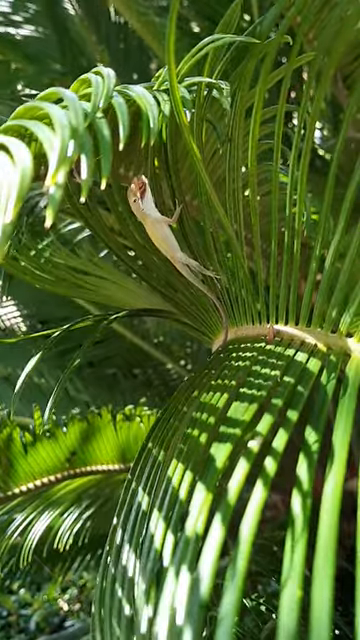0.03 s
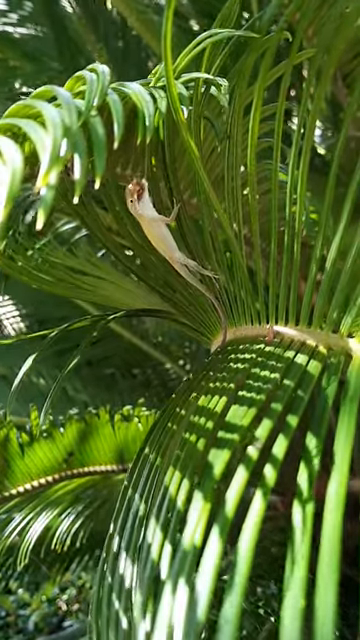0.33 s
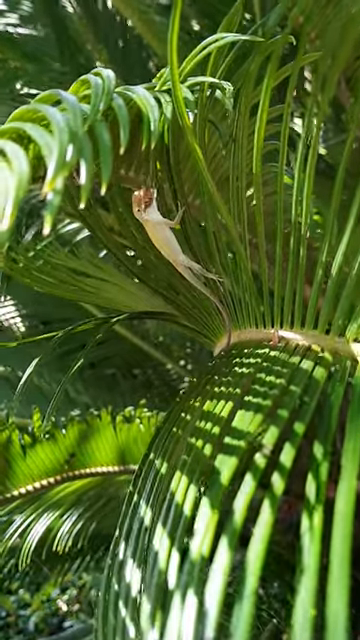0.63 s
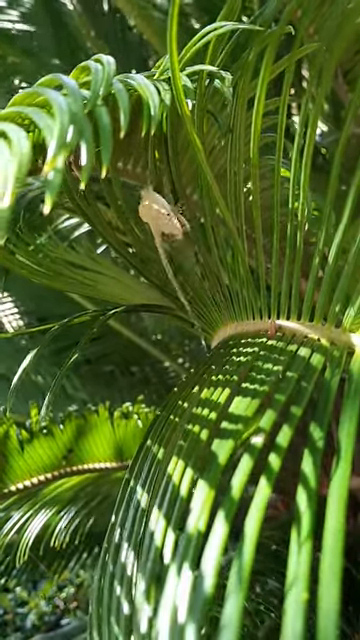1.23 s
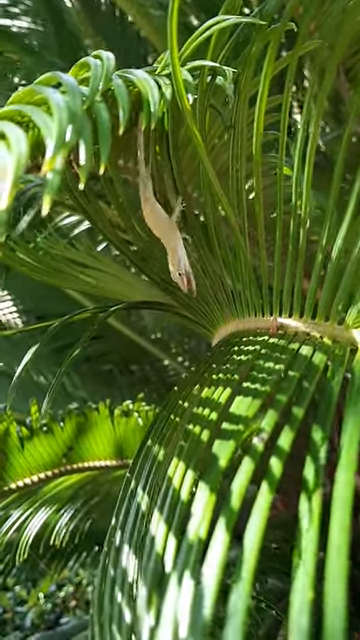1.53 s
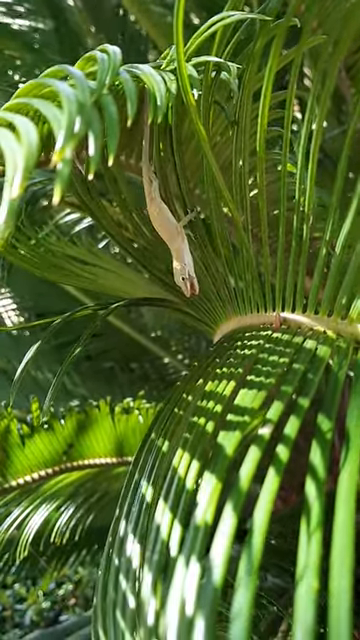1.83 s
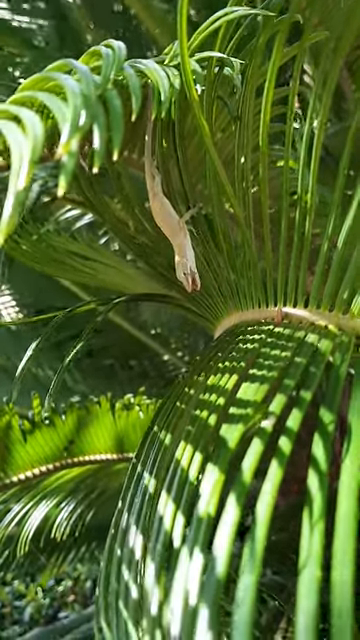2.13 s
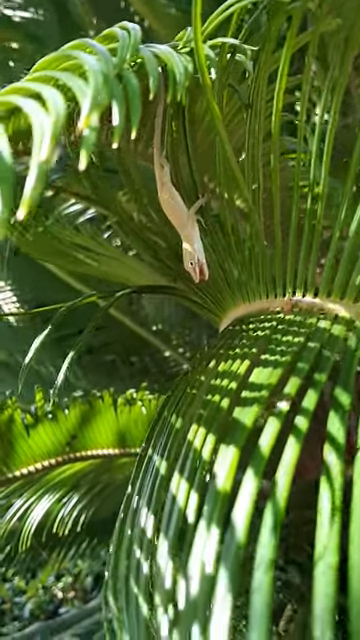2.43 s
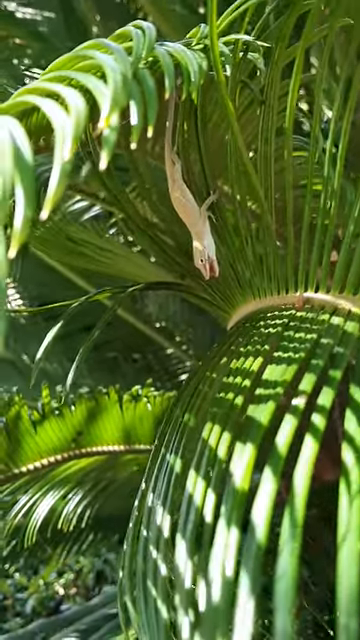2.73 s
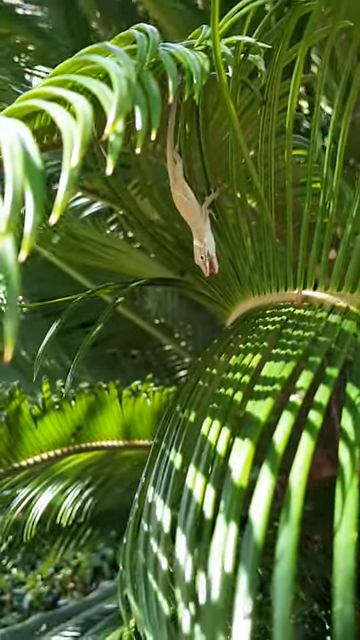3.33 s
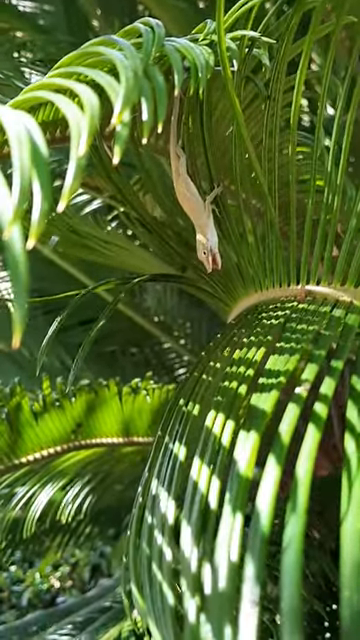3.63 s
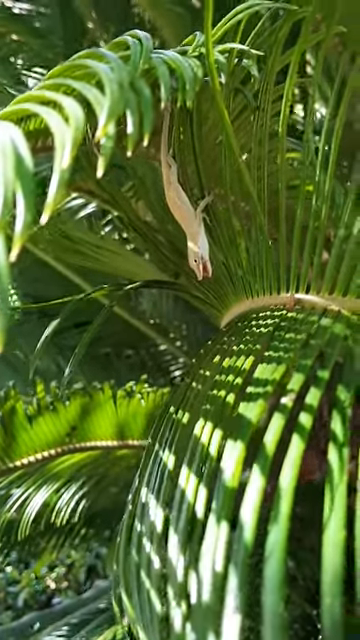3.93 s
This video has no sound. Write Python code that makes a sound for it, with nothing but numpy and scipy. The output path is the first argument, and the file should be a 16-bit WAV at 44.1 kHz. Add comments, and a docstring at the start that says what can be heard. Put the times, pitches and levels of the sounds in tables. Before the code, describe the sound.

Distant traffic rumbles low throughout, with a faint high insect hiss and thin whine in a garden. Soft dull bumps come at about 0.6 seconds. From 1.2 seconds a far engine drone swells three times, rising slightly in pitch until 3.2 seconds. Leaves tick at 1.5 and 1.8 seconds, and light gusts touch the microphone. Near 4 seconds, faint tyre hiss, leaf rustle and a high buzz grow.

```python
"""A garden: far traffic, an insect chorus and a thin steady whine run throughout.
Very high hiss, probably insects, comes in waves from the right; single whine partials swell briefly.
A faint low note at 0.4 s precedes four soft bumps. From 1.2 s a distant engine's low drone swells
three times, gaining speed until 3.2 s. Leaves rustle and tick twice (1.5 s, 1.8 s); two light gusts
rumble on the microphone. At the end an approaching car's tyre hiss grows and a high buzz starts."""
import sys
import numpy as np
from scipy import signal
from scipy.io import wavfile

SR = 44100
rng = np.random.default_rng(int(sys.argv[2]) if len(sys.argv) > 2 else 0)


def store_pcm(level_fs):
    """Save levels as 16-bit WAV."""
    pcm = np.round(np.clip(level_fs, -1, 1) * 32767).astype(np.int16)
    wavfile.write(sys.argv[1], SR, np.atleast_2d(pcm).T)


N = 176400
T = np.arange(N) / SR


def engine():
    """Distant engine: only the lowest firing orders and some exhaust rumble carry this far."""
    # firing rate: t/s, f/Hz
    firing_hz = [(0, 74), (1.15, 84.5), (1.35, 87.4), (1.75, 88.5), (2.05, 92.5), (2.35, 97.5),
                 (2.65, 100.5), (3.0, 102), (3.2, 103.7), (3.4, 101.5), (4, 90)]
    # loudness: t/s, level/dB
    loudness = [(0, -59), (1.14, -59), (1.22, -40.5), (1.4, -41), (1.56, -39.5), (1.63, -38), (1.72, -39),
                (1.87, -59.5), (2.01, -49.5), (2.06, -35.5), (2.2, -41), (2.35, -35), (2.55, -39),
                (2.68, -38.5), (2.75, -51), (2.84, -39), (2.9, -43), (3.0, -32.5), (3.13, -34.5),
                (3.19, -30), (3.27, -34.5), (3.36, -37), (3.48, -46.5), (4, -55.5)]
    # harmonics: multiple of firing rate, relative level/dB
    orders = [(1, 0.5), (2, -20.5), (3, -24.5)]
    # exhaust spectrum: f/Hz, relative density/dB
    spectrum = [(30, -19), (55, -12), (90, 3), (160, -6), (230, -15), (330, -9), (480, -30), (1000, -17.5),
                (3000, -73)]
    level_db = in_time(loudness)
    wobble, flutter_db = .005, .9
    hz = in_time(firing_hz) * (1 + wobble * drift(13.2))
    phase = 2 * np.pi * np.cumsum(hz) / SR
    drone = sum(from_db(level_db + order_db + flutter_db * drift(14)) * np.sin(order * phase)
                for order, order_db in orders)
    exhaust_db = -48.5 + .32 * (level_db - level_db.mean())  # follows the drone weakly
    exhaust = from_db(exhaust_db) * air_noise(spectrum, flicker_db=2.2)
    return (np.sqrt(2) * drone + exhaust) * pan(.9)


def traffic():
    """Low town rumble under a slowly growing wash of tyres."""
    # town rumble spectrum: f/Hz, relative density/dB
    rumble_spectrum = [(22, -42), (38, -17), (55, -2.5), (80, 0.5), (110, -3.5), (150, -1), (240, -13),
                       (320, -3.5), (430, -24), (700, -22), (2000, -39.5)]
    # rumble loudness: t/s, level/dB
    rumble_db = [(0, -48.5), (1.0, -47.5), (1.6, -46), (4, -46.5)]
    # tyre spectrum: f/Hz, relative density/dB
    tyre_spectrum = [(150, -8.5), (450, -6), (760, 1), (1200, -0.5), (1700, -7), (2500, -15), (3400, -29.5),
                     (5000, -46), (8000, -56), (9500, -37), (11500, -48), (15500, -60)]
    # tyre loudness: t/s, level/dB
    tyre_db = [(0.0, -50.5), (0.59, -50), (0.92, -50.5), (3.35, -48.5), (3.59, -49), (4.0, -47)]
    # tyre balance: f/Hz, left minus right/dB
    tyre_pans = [(400, 8), (750, 2), (1300, 0), (2400, -4.5), (4000, 17), (15000, 19)]
    rumble = from_db(in_time(rumble_db)) * air_noise(rumble_spectrum, flicker_db=1.8) * pan(-.3)
    tyres = from_db(in_time(tyre_db)) * air_noise(tyre_spectrum, flicker_db=1, pans=tyre_pans)
    return rumble + tyres


def bumps():
    """A cluster of dull thuds, each a puff of noise and a brief low ring."""
    # thuds: t/s, level/dB, puff decay/s
    thuds = [(.573, -35.5, .045), (.600, -40, .03), (.617, -37.3, .05), (.685, -39.5, .04)]
    # puff spectrum: f/Hz, relative density/dB
    spectrum = [(25, -30), (55, 0), (110, 4), (150, -4), (200, -11), (280, -11), (450, -23), (900, -22),
                (2500, -61)]
    # ringing modes: f/Hz, relative level/dB, t60/s
    modes = [(59.2, 1, 0.36), (112.1, 1, 0.34), (277, -15, 0.089)]
    attack_s = .004
    envelope = sum(from_db(db) * strike(start_s, attack_s, decay_s) for start_s, db, decay_s in thuds)
    out = envelope * air_noise(spectrum, flicker_db=0)
    for start_s, db, _ in thuds:
        for hz, mode_db, t60_s in modes:
            ring = from_db(db + mode_db) * strike(start_s, attack_s, t60_s / np.log(1000))
            out += ring * np.sin(2 * np.pi * hz * (T - start_s))
    return out


def leaf_ticks():
    """Stiff fronds tick twice: a sharp snap, then a short crackle."""
    # ticks: t/s, snap level/dB, crackle level/dB, centre f/Hz, crackle decay/s
    ticks = [(1.455, -47.5, -52.5, 3900, 0.018), (1.812, -51, -58, 8500, 0.027)]
    # balance per tick: left minus right/dB
    pans_db = [-1, 3]
    attack_s, snap_decay_s, edge_ratio = .0008, .003, 1.6
    out = 0
    for (start_s, snap_db, crackle_db, hz, decay_s), pan_db in zip(ticks, pans_db):
        grain = rng.standard_normal((2, N)) * from_db(2 * drift(200))
        body = rms_one(band(grain, hz / edge_ratio, hz * edge_ratio, order=1))
        snap = from_db(snap_db) * strike(start_s, attack_s, snap_decay_s)
        crackle = from_db(crackle_db) * strike(start_s, attack_s, decay_s)
        out += np.maximum(snap, crackle) * body * pan(pan_db)
    return out


def insect_waves():
    """Waves of very high hiss; three carry a shrill crest that dies first."""
    # hiss waves: t/s, attack/s, hold/s, release/s, level/dB
    waves = [(.1, .2, .04, .15, -73), (.69, 0.086, 0.29, 0.59, -63), (1.8, 0.26, 0.11, 0.36, -66.5),
             (2.585, 0.063, 0.46, 0.29, -62.5), (3.8, 0.18, .1, .1, -68)]
    # hiss spectrum: f/Hz, relative density/dB
    spectrum = [(7000, -17), (9500, -11.5), (11000, -6.5), (12800, -4), (15300, -2.5)]
    # hiss balance: f/Hz, left minus right/dB
    pans = [(10000, -1), (12000, -4), (14500, -15)]
    # crests: t/s, attack/s, hold/s, release/s, level/dB
    crests = [(.735, .055, .31, .12, -64.5), (1.98, .12, .08, .22, -70), (2.595, .045, 0.23, .13, -62)]
    hiss = swells(waves) * air_noise(spectrum, flicker_db=.3, pans=pans)
    return hiss + swells(crests) * narrow_noise(15000, width_hz=1900) * pan(-18)


def insect_chorus():
    """Many insects merge into a continuous high hiss."""
    # chorus spectrum: f/Hz, relative density/dB
    spectrum = [(2800, -25), (4200, -5.5), (5200, -1.5), (6300, -1), (7300, -1), (8500, -1), (9400, -18),
                (11000, -11.5), (15500, -11.5)]
    # loudness: t/s, level/dB
    loudness = [(0, -65), (.5, -64.5), (.75, -62), (1.1, -64), (1.7, -62), (1.95, -63.5), (2.1, -60.5),
                (2.36, -60), (2.48, -63.5), (3.3, -62), (4, -63.5)]
    # balance: f/Hz, left minus right/dB
    pans = [(4500, 2.5), (6300, -9), (8000, 1), (10000, 8), (14000, -6.5)]
    return from_db(in_time(loudness)) * air_noise(spectrum, flicker_db=.9, pans=pans)


def whine():
    """High steady partials, each fading in and out on its own at either ear."""
    # partials: f/Hz, relative level/dB
    partials = [(4210, -89), (5146, -87), (5615, -82), (5701, -86), (5846, -80), (5938, -85), (6083, -84),
                (6169, -83), (6320, -79), (6546, -83), (6638, -86), (6788, -86), (7020, -84), (7106, -85),
                (7251, -84), (7488, -87), (7574, -89), (7720, -89), (7957, -84), (8043, -89), (8188, -90),
                (8511, -91), (8893, -94)]
    gain_db, fade_db = 2.3, 3
    out = np.zeros((2, N))
    for hz, db in partials:
        for ear in out:
            fade = from_db(fade_db * drift(1))
            phase = 2 * np.pi * (hz * T + rng.random()) + drift(2.4)
            ear += from_db(db + gain_db) * rms_one(fade * np.sin(phase))
    return out * pan(-4)


def whine_swells():
    """Single partials of the whine swell briefly."""
    # swelling partials: t/s, attack/s, hold/s, release/s, level/dB, f/Hz
    partials = [(.62, .06, .22, .15, -71.5, 6550), (.66, .08, .28, .2, -71, 5850),
                (1.1, .3, .3, .1, -72, 6320), (1.45, .1, .27, .1, -71.5, 5615),
                (2.0, .06, .3, .08, -70.5, 5590), (2.0, .15, .25, .1, -72.5, 6320),
                (3.08, .1, .2, .15, -72.5, 6320), (3.0, .15, .45, .1, -76, 5615)]
    return sum(swells([swell]) * narrow_noise(hz, width_hz=36) for *swell, hz in partials) * pan(-4)


def high_buzz():
    """A high, narrow buzz starts at the end."""
    # buzz: t/s, attack/s, hold/s, release/s, level/dB
    buzz = [(3.81, .15, .04, .1, -62.3)]
    return swells(buzz) * narrow_noise(13000, width_hz=1500) * pan(-13)


def low_note():
    """A faint, slightly falling note just before the bumps."""
    # note: t/s, attack/s, hold/s, release/s, level/dB
    note = [(.435, 0.023, 0.019, 0.02, -46)]
    start_hz, sag_hz_per_s = 359, 840
    hz = start_hz - sag_hz_per_s * np.clip(T - note[0][0], 0, .1)
    return swells(note) * np.sqrt(2) * np.sin(2 * np.pi * np.cumsum(hz) / SR)


def breeze():
    """Light gusts rumble on the microphone."""
    # gusts: t/s, attack/s, hold/s, release/s, level/dB
    gusts = [(1.4, 0.56, .6, .6, -59), (2.56, .08, .07, .07, -47.5)]
    # gust spectrum: f/Hz, relative density/dB
    spectrum = [(20, -26), (35, -8), (55, 0), (85, -6), (160, -24)]
    return swells(gusts) * air_noise(spectrum, flicker_db=2) * pan(6)


def approaching_car():
    """Brighter tyre hiss grows towards the end."""
    # tyre spectrum: f/Hz, relative density/dB
    spectrum = [(900, -13), (1600, -2.5), (2200, 3.5), (2700, 5), (3300, -15.5), (4500, -40)]
    # loudness: t/s, level/dB
    loudness = [(0, -70), (2.5, -82), (3.1, -67.5), (3.5, -60.5), (4, -58)]
    return from_db(in_time(loudness)) * air_noise(spectrum, flicker_db=1.5) * pan(-2.5)


def leaf_rustle():
    """Leaves stir in four faint swells of bright noise."""
    # rustles: t/s, attack/s, hold/s, release/s, level/dB
    rustles = [(.58, 0.2, 0.28, 0.17, -67.5), (1.98, .08, 0.28, 0.087, -66.5), (2.6, .1, 0.12, 0.36, -67),
               (3.78, 0.17, .1, 0.11, -57.5)]
    # rustle spectrum: f/Hz, relative density/dB
    spectrum = [(1200, -22), (2300, 13.5), (3500, 8), (5600, 1.5), (8000, 8.5), (9500, -1), (15000, -24)]
    return swells(rustles) * air_noise(spectrum, flicker_db=-.5) * pan(-3.5)


def air_noise(spectrum, flicker_db, pans=((100, 0),)):
    """Stereo noise in third octaves, each with its own level, flicker, coherence and pan; rms 1."""
    # likeness of the two ears: f/Hz, correlation
    coherence = [(30, 1), (70, 0.98), (150, 0.98), (330, 0.93), (650, 0.69), (1300, 0.21), (2600, 0.41),
                 (5000, 0), (15000, 0)]
    edges_hz = 20 * 2 ** (np.arange(30) / 3)
    out, white = 0, rng.standard_normal((2, 2, N + SR // 10))
    for k, (low_hz, high_hz) in enumerate(zip(edges_hz, edges_hz[1:])):
        if spectrum[0][0] < high_hz and low_hz < spectrum[-1][0]:
            hz = np.sqrt(low_hz * high_hz)
            mid, side = band(white[k % 2], low_hz, high_hz)[:, -N:]
            alike = at_hz(coherence, hz)
            stereo = np.sqrt(1 + alike) * mid + np.sqrt(1 - alike) * side * [[1], [-1]]
            gain = from_db(at_hz(spectrum, hz) + flicker_db * drift(9.3))
            out += gain * stereo * pan(at_hz(pans, hz))
    return rms_one(out)


def narrow_noise(hz, width_hz):
    """One noise band, uncorrelated between the ears; rms 1."""
    return rms_one(band(rng.standard_normal((2, N)), hz - width_hz / 2, hz + width_hz / 2))


def band(x, low_hz, high_hz, order=2):
    """Butterworth band-pass."""
    sos = signal.butter(order, [low_hz, min(high_hz, .45 * SR)], "band", fs=SR, output="sos")
    return signal.sosfilt(sos, x)


def drift(rate_hz):
    """Smooth random wander; rms 1."""
    hop, settle = 40, 2000
    pole = np.exp(-2 * np.pi * rate_hz * hop / SR)
    white = rng.standard_normal(N // hop + settle + 2)
    slow = signal.lfilter([1], [1, -2 * pole, pole * pole], white)[settle:]
    return np.interp(np.arange(N) / hop, np.arange(len(slow)), rms_one(slow))


def swells(rows):
    """Sum of attack-hold-release envelopes."""
    return sum(from_db(db) * np.interp(T, start_s + np.cumsum([0, *stages_s]), [0, 1, 1, 0])
               for start_s, *stages_s, db in rows)


def strike(start_s, attack_s, decay_s):
    """Linear rise, exponential fall."""
    age_s = T - start_s
    return np.clip(age_s / attack_s, 0, 1) * np.exp(-np.maximum(age_s - attack_s, 0) / decay_s)


def in_time(rows):
    """Breakpoint curve at every sample."""
    return np.interp(T, *np.transpose(rows))


def at_hz(rows, hz):
    """Breakpoint curve on a log-frequency axis."""
    points_hz, values = np.transpose(rows)
    return np.interp(np.log(hz), np.log(points_hz), values)


def pan(db):
    """Constant-power gains; db is left minus right."""
    return rms_one(from_db(np.array([[db], [-db]]) / 2))


def from_db(db):
    """Decibels to gain."""
    return 10 ** (np.asarray(db) / 20)


def rms_one(x):
    """Scale to unit rms."""
    return x / np.sqrt(np.mean(x ** 2) + 1e-20)


def scene():
    """Everything heard from among the fronds."""
    main = engine() + traffic() + bumps() + leaf_ticks()
    treble = insect_waves() + insect_chorus() + whine_swells() + high_buzz() + whine()
    background = low_note() + breeze() + approaching_car() + leaf_rustle()
    return main + treble + background


def record(dry):
    """A shallow treble dip near 9.6 kHz and a steep top cut."""
    notch_hz, notch_depth, cutoff_hz = 9580, .62, 15480
    notched = signal.lfilter(*signal.iirnotch(notch_hz, Q=15, fs=SR), dry)
    coloured = (1 - notch_depth) * dry + notch_depth * notched
    return signal.sosfilt(signal.ellip(14, .1, 80, cutoff_hz, fs=SR, output="sos"), coloured)


dry = scene()
out = record(dry)
store_pcm(out)
```